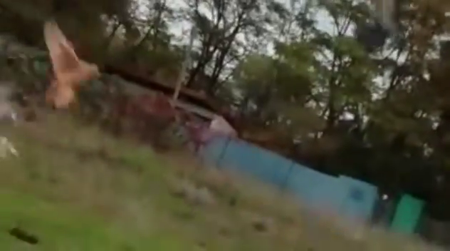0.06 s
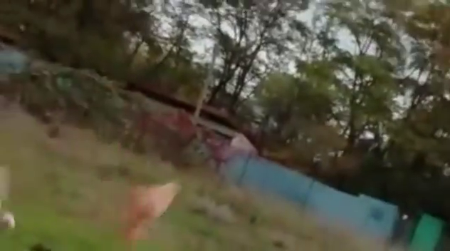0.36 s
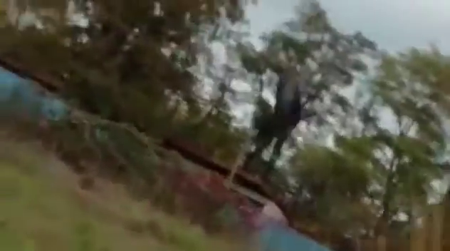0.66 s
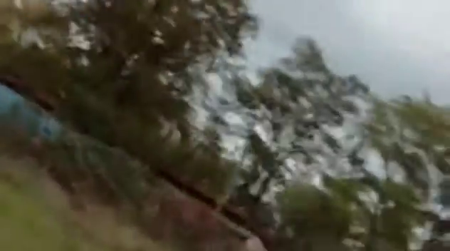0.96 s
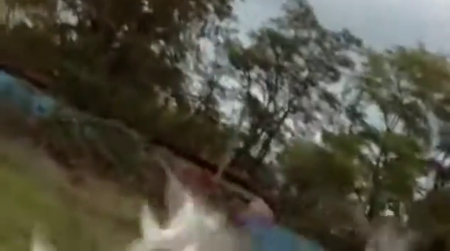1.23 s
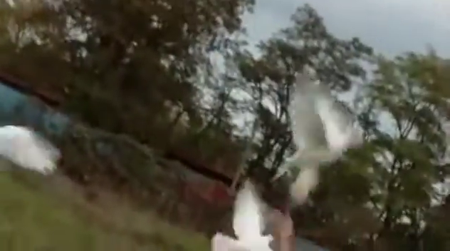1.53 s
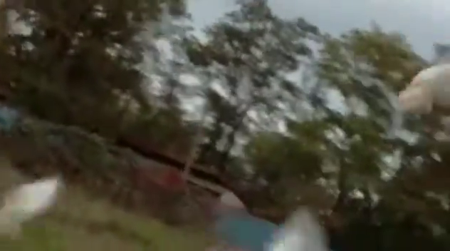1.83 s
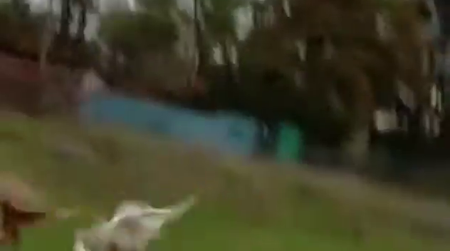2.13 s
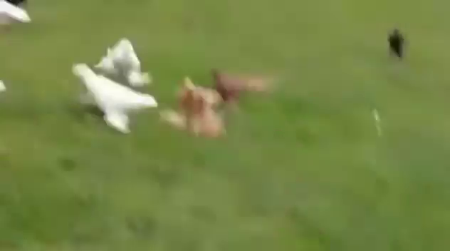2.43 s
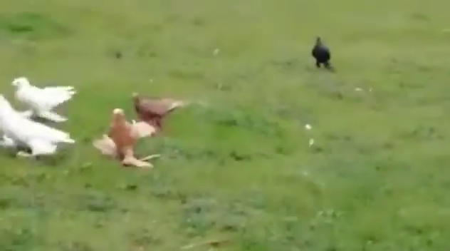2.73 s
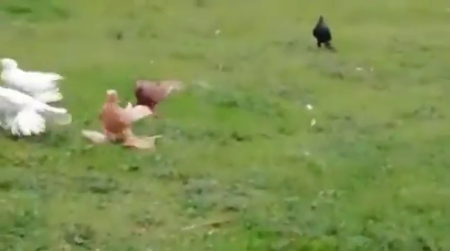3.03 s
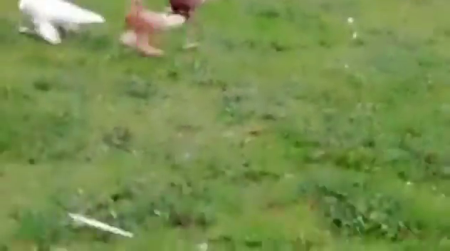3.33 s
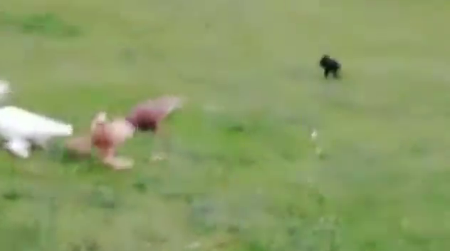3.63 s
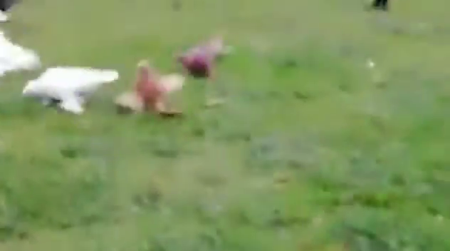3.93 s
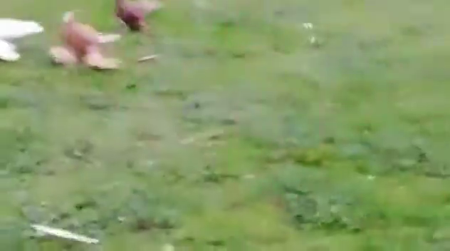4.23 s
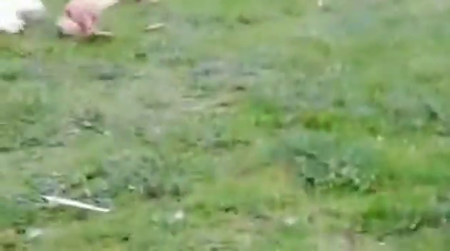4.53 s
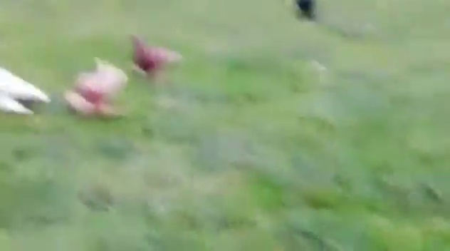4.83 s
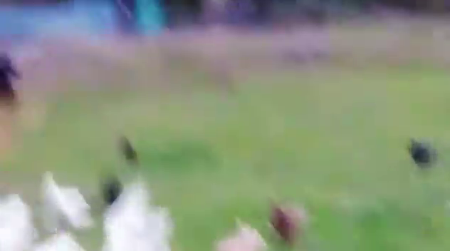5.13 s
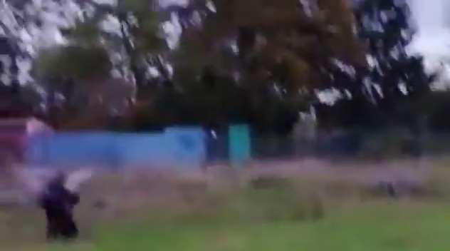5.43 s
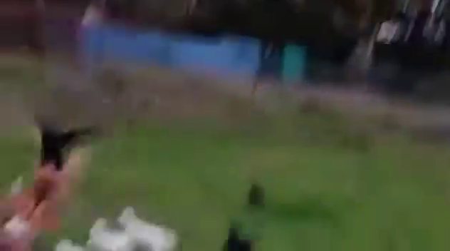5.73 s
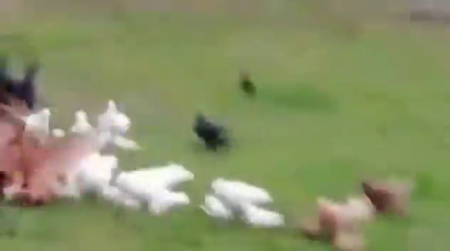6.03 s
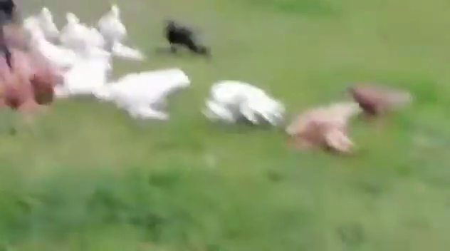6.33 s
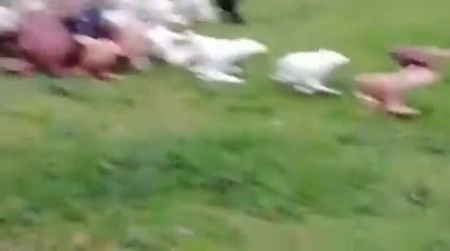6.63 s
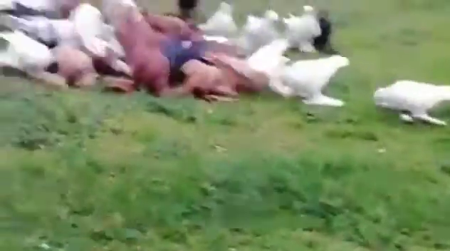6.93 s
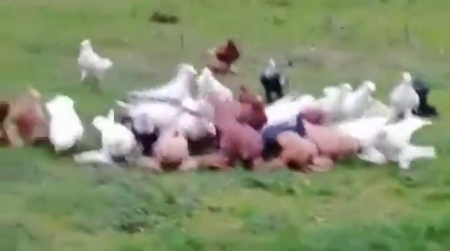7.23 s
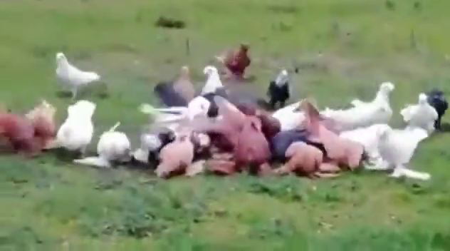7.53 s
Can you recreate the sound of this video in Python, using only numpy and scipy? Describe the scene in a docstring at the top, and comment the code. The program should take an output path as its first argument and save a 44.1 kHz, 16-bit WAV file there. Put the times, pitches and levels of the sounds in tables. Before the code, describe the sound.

Sharp wing claps and busy flapping open the scene as pigeons lift off from a yard. As they ease, something rustles nearby and flight feathers whistle faintly overhead. Light pecking follows, mixed with occasional flutters, tiny chirps and brief quiet coos, and then another burst of loud wing claps. The hand-held microphone catches soft wind puffs and a steady background hum, with one side sounding muffled.

```python
"""Pigeons take off from the grass of a yard: feathers flutter and flick, wings push air, and wing tips
clap, the fullest claps knocking on a trapped pocket of air. From about 2 s something rustles softly close
by and flight feathers whistle overhead. From about 3 s beaks peck at thrown feed; faint chirps and short
coos follow, and loud claps return at 7.5 s. Throughout, the yard hums and a breeze rumbles on a
hand-held recorder with one open port and one shadowed port."""
import sys
import numpy as np
from scipy import signal
from scipy.fft import rfft, irfft, next_fast_len
from scipy.io import wavfile
from scipy.ndimage import uniform_filter1d

SR = 44100
rng = np.random.default_rng(int(sys.argv[2]) if len(sys.argv) > 2 else 0)


def store_pcm(level_fs):
    """Save levels as 16-bit WAV."""
    pcm = np.round(np.clip(level_fs, -1, 1) * 32767).astype(np.int16)
    wavfile.write(sys.argv[1], SR, np.atleast_2d(pcm).T)


N = 342657
TIME = np.arange(N) / SR

# Spectra of the sources and of the echo. Each row: frequency in Hz, relative spectral density in dB.
RUMBLE_SPECTRUM = [(12, -5.5), (28, 1), (50, 0.5), (100, -4), (150, -15), (300, -41), (1000, -63)]
DRAUGHT_SPECTRUM = [(60, -4), (150, -2.5), (260, -3), (350, -9), (500, -28), (1500, -37.5)]
YARD_HUM_SPECTRUM = [(120, -28), (300, -4.5), (450, -0.5), (650, -2), (900, 1), (1300, -5.5), (2000, -13.5),
                     (3200, -20.5), (6000, -21), (14000, -14.5)]
FEATHER_RUSH_SPECTRUM = [(150, -19), (450, 3), (750, 2.5), (1300, 2.5), (2000, 1.5), (3200, -1.5),
                         (4200, -7), (5800, -2), (9000, -9), (15000, -25)]
FEATHER_EDGE_SPECTRUM = [(1500, -4), (4000, 7), (6000, 4.5), (10500, 7), (13500, 10), (16000, -26)]
CLAP_SPECTRUM = [(100, -51), (450, -32), (800, -5), (1150, 2), (1700, 5), (2800, 5.5), (4200, 0), (5800, 3),
                 (10000, 2), (13500, 3.5), (15500, -6)]
ECHO_SPECTRUM = [(200, 1.5), (700, 5.5), (2000, -9), (5000, -9), (14000, -52)]
CAPSULE_HISS_SPECTRUM = [(1500, -7.5), (3000, -9), (5000, -11.5), (12000, -18)]
# Breeze on the ports. Each row: time in seconds, relative level in dB.
BREEZE_LEVELS = [(0.0, -57), (0.5, -58.5), (1.25, -53), (3.01, -61), (5.6, -61), (5.89, -61), (6.79, -62.5),
                 (7.77, -62.5)]
# Puffs of wind on the ports. Each row: peak time in seconds, 1/e half length in seconds, level in dB.
WIND_PUFFS = [(2.437, 0.097, -53.5), (3.882, 0.087, -56.5), (4.194, 0.078, -50.5), (5.89, 0.077, -42.5),
              (6.388, 0.039, -42.5), (7.576, 0.032, -55)]
# Low draught of the wings. Each row: time in seconds, relative level in dB.
DRAUGHT_LEVELS = [(0.0, -66.5), (0.2, -58.5), (0.46, -58), (0.67, -64), (0.8, -58), (0.92, -46),
                  (0.99, -49), (1.11, -48), (1.2, -58), (1.31, -50.5), (1.4, -54.5), (1.53, -52.5),
                  (1.66, -60), (1.95, -63), (2.81, -67), (4.8, -70), (5.39, -61.5), (5.63, -69.5),
                  (6.04, -61.5), (6.43, -71), (7.36, -73.5), (7.77, -61)]
# Flutter of the flock. Each row: time in seconds, relative levels of rush and of edge hiss in dB.
FLOCK_LEVELS = [(0.0, -54, -57), (0.48, -54.5, -62), (0.69, -56.5, -56), (0.89, -49.5, -54),
                (0.97, -43, -50), (1.03, -42.5, -42.5), (1.13, -50.5, -54), (1.22, -47.5, -52.5),
                (1.43, -53, -51.5), (1.48, -53.5, -61), (1.56, -48, -55), (2.08, -55.5, -62),
                (2.53, -55.5, -56), (2.73, -59, -64), (3.24, -60.5, -67), (3.51, -65.5, -69),
                (4.05, -65, -72.5), (4.67, -69, -70.5), (5.19, -61.5, -62), (5.52, -64, -73.5),
                (6.04, -63, -67.5), (6.47, -71.5, -70), (7.2, -73.5, -89), (7.55, -63.5, -69),
                (7.77, -61.5, -69)]
# Near birds beating their wings. Each row: first stroke, last stroke and beat period in seconds,
# swish in dB relative to the flock.
WINGBEAT_RUNS = [(0.063, 0.595, 0.13, -2.5), (0.742, 1.1, 0.17, -5.5), (0.885, 2.15, 0.12, -28),
                 (1.32, 1.47, 0.1, -4), (1.555, 2.06, 0.11, -6.5), (2.922, 3.31, 0.13, -1.5),
                 (5.19, 5.45, 0.121, -12), (5.225, 5.77, 0.061, -24), (7.515, 7.77, 0.13, 3.5)]
# Light ticks: wing flicks in flight, later (about 3 to 7 s) beaks pecking at feed.
# Each row: time in seconds, level in dB, treble tilt in dB.
FLICKS_AND_PECKS = [(0.034, -48, 8), (0.044, -37, 0), (0.058, -38.5, -1), (0.065, -38, -5), (0.169, -40, 9),
                    (0.225, -42, 14), (0.305, -45, 13), (0.325, -40, 6), (0.406, -39.5, 21),
                    (0.456, -42, -4), (0.469, -31, 13), (0.5445, -52, 10), (0.588, -40.5, 6),
                    (0.613, -46, -10), (0.718, -41, 3), (0.7416, -46, -9), (0.77, -42.5, -22),
                    (0.825, -35, 3), (0.8998, -37, 8), (0.9575, -41, -2), (1.007, -32, 7), (1.082, -41, 7),
                    (1.1175, -30, -14), (1.190, -36, 6), (1.2344, -44, 5), (1.271, -30, 5),
                    (1.3917, -37, -3), (1.433, -36, -1), (1.4495, -39, -3), (1.503, -33, 6),
                    (1.5552, -34, 1), (1.633, -37.5, 7), (1.7091, -40, 14), (1.745, -34.5, 9),
                    (1.814, -38, -14), (1.870, -37.5, 6), (1.8875, -40, 7), (1.923, -33.5, 4),
                    (2.047, -39, 12), (2.063, -37, -4), (2.136, -53, -3), (2.291, -41, 13),
                    (2.548, -42.5, -1), (2.677, -41.5, 2), (2.7337, -47, 8), (2.893, -45.5, 8),
                    (2.951, -43.5, 12), (3.132, -49, 17), (3.18, -42, 2), (3.263, -47, 14),
                    (3.3157, -43, 5), (3.407, -52, -18), (3.441, -50, -13), (3.6367, -56, 10),
                    (3.7112, -53, 13), (3.744, -48.5, 2), (3.78, -49, -16), (4.0402, -57, -24),
                    (4.342, -49.5, 4), (4.397, -59, -2), (4.706, -53, 4), (4.766, -48.5, -1),
                    (5.1001, -49, 3), (5.15, -56, 5), (5.202, -46, -7), (5.328, -47, -10),
                    (5.436, -46.5, -2), (5.496, -46, 1), (5.631, -42.5, -3), (5.646, -49, -5),
                    (5.6951, -63, -15), (5.8575, -54, 0), (5.919, -52.5, -6), (6.127, -48, -6),
                    (6.19, -53.5, -2), (6.3983, -52.5, -4), (6.465, -52, -3), (6.519, -52.5, 8),
                    (6.717, -50, 11), (6.81, -52.5, 0), (7.237, -52, 11), (7.425, -47, 21),
                    (7.5054, -28.5, 8), (7.759, -43, 9)]
# Wing tips meeting, and between about 3 and 7 s isolated ticks of beaks pecking. Each row: time in seconds, #
# level in dB, treble tilt in dB, decay time in ms, resonance in Hz.
CLAPS_AND_TICKS = [(0.2013, -36, 2, 2.7, 3900), (0.4622, -34, 5, 2.1, 6200), (0.4882, -37, 8, 2.0, 5800),
                   (0.7107, -25.5, -2, 2.4, 5200), (0.8879, -32, -1, 1.3, 2600), (0.9288, -26.5, -2, 1.3, 2900),
                   (0.9364, -32, 5, 2.0, 5900), (0.9465, -22.5, 1, 1.4, 2400), (1.0124, -29, 10, 1.4, 6200),
                   (1.0492, -21.3, 3, 1.5, 4700), (1.0609, -30, -1, 2.8, 4400), (1.112, -27, -1, 3.0, 4300),
                   (1.1375, -34, -3, 1.7, 1700), (1.1698, -34, 3, 1.8, 3400), (1.2514, -32, 4, 1.9, 6200),
                   (1.2915, -29, 7, 1.6, 6200), (1.3782, -37, 3, 1.4, 6200), (1.4015, -32, 5, 1.7, 6000),
                   (1.4233, -31, 0, 2.8, 2800), (1.4532, -17.3, -5, 1.0, 3200), (1.4992, -35.5, -2, 1.8, 6100),
                   (1.5116, -33, 8, 1.7, 5500), (1.5424, -32.5, -4, 1.2, 3300), (1.5633, -34, -3, 3.3, 2700),
                   (1.6221, -35, 5, 2.2, 5200), (1.6796, -24.8, 0, 1.6, 2800), (1.7651, -32, -1, 2.6, 2800),
                   (1.8015, -28.5, -4, 1.7, 3000), (1.929, -36, 0, 1.9, 5800), (1.9972, -36, 0, 2.5, 3300),
                   (2.0194, -36, -7, 1.3, 2000), (2.1575, -35, 5, 1.3, 5600), (2.5181, -39, -5, 1.3, 3200),
                   (3.0519, -38, 2, 2.2, 5100), (3.3637, -41, 2, 1.6, 2300), (3.5869, -43, 8, 1.2, 6200),
                   (3.8545, -35, 9, 1.3, 11000), (4.2054, -42, 9, 1.1, 6000), (4.2579, -47, 4, 2.1, 6200),
                   (4.5628, -47, 5, 1.3, 5100), (4.9261, -48, 0, 1.9, 4900), (4.973, -43, 8, 1.3, 6200),
                   (5.1535, -37.5, -5, 1.1, 3600), (5.2295, -39, 4, 2.6, 5900), (5.3018, -34.5, 0, 2.6, 4700),
                   (5.3535, -41, 6, 1.6, 1600), (5.784, -42, -3, 2.4, 3400), (5.7933, -38, 6, 1.4, 4400),
                   (6.4406, -36, 2, 1.5, 3200), (6.8334, -43, -2, 1.8, 2000), (6.9476, -35, 8, 1.4, 12000),
                   (7.5086, -27, 1, 3.2, 5900), (7.635, -21, 2, 3.4, 4700), (7.7625, -40, -1, 2.3, 5500)]
# Air pockets trapped by claps. Each row: start in seconds, pitch in Hz, fundamental's peak in dB.
AIR_KNOCKS = [(0.7105, 2180, -25.5), (1.0495, 1110, -39), (1.453, 810, -30), (1.68, 965, -37),
              (6.9465, 325, -40.5), (7.507, 660, -27), (7.636, 1290, -30), (7.757, 1530, -37)]
# Short bands of noise: soft rustles and, in the last two rows, the ring and tail of the last claps.
# Each row: peak time, rise and fall in seconds, level in dB, centre in Hz, width in octaves.
RUSTLES_AND_CLAP_TAILS = [(2.2, 0.029, 0.02, -39, 1550, 0.16), (2.205, 0.038, 0.012, -38.5, 2860, 0.46),
                          (2.3, 0.02, 0.045, -45, 1660, 0.35), (2.41, 0.11, 0.032, -47, 3100, 0.34),
                          (2.429, 0.076, 0.042, -46, 5400, 0.13), (2.552, 0.023, 0.026, -40, 5340, 0.1),
                          (2.61, 0.039, 0.041, -40.5, 5650, 0.3), (2.672, 0.024, 0.034, -43, 5900, 0.36),
                          (2.6, 0.067, 0.064, -48, 2830, 0.16), (2.699, .004, .012, -54, 3200, .1),
                          (2.902, .008, .004, -43, 6000, 0.21), (2.927, 0.0063, 0.011, -41, 5800, 0.21),
                          (2.953, 0.007, 0.011, -36.5, 6100, 0.23), (2.979, .004, .014, -41.5, 6240, 0.23),
                          (3.845, 0.041, 0.024, -39.5, 10700, 0.38),
                          (3.845, 0.029, 0.028, -44.5, 13300, 0.22),
                          (3.856, 0.012, 0.0084, -36.5, 1780, 5.1), (4.06, 0.023, 0.027, -62, 1380, 0.21),
                          (5.19, 0.05, 0.046, -55, 4800, 0.65), (6.452, 0.0092, 0.0079, -45, 10000, 1.6),
                          (6.888, 0.038, 0.012, -52, 1660, 0.8), (7.42, 0.019, 0.023, -53.5, 1500, 1.6),
                          (7.524, 0.0063, 0.017, -45.5, 655, 0.17), (7.658, .008, 0.024, -48, 3600, 1.3)]
# Whistling wing strokes. Each row: first stroke, last stroke and beat period in seconds,
# typical start pitch in Hz, typical level in dB.
WHISTLE_RUNS = [(2.35, 3.4, 0.131, 670, -55), (7.11, 7.26, 0.15, 600, -61)]
# Chirps and coos. Each row: start and length in seconds, start and end pitch in Hz, level in dB.
CHIRP_NOTES = [(3.908, 0.052, 2420, 2290, -55.5), (3.91, .04, 1590, 1620, -58),
               (3.922, .04, 1090, 1150, -57), (3.92, .04, 770, 790, -59), (4.055, 0.034, 2360, 2340, -55),
               (7.275, 0.036, 1980, 2050, -60)]
COO_NOTES = [(4.082, 0.052, 276, 265, -42), (4.155, 0.072, 156, 157, -52.5), (4.16, 0.065, 319, 296, -50.5),
             (5.895, 0.035, 445, 475, -54), (5.95, 0.04, 414, 390, -52), (5.998, 0.036, 364, 318, -51.5),
             (6.052, 0.05, 214, 206, -49.5), (6.215, 0.04, 249, 240, -61), (6.849, 0.18, 333, 276, -66)]


def from_db(db):
    """Amplitude grows tenfold for every 20 dB."""
    return 10 ** (np.asarray(db) / 20)


def rms_one(x):
    """Normalisation brings a signal to unit mean power."""
    return x / np.sqrt(np.mean(x ** 2) + 1e-20)


def in_time(rows):
    """Linear interpolation gives each column of a level table at every sample."""
    times, *columns = np.transpose(rows)
    return [np.interp(TIME, times, column) for column in columns]


def coloured(x, spectrum, bright_db=0):
    """Spectral shaping weights each frequency, with a tilt of bright_db from 2 to 10 kHz; rms 1."""
    size = next_fast_len(len(x))
    log_hz = np.log(np.fft.rfftfreq(size, 1 / SR) + 1)
    hz, db = np.transpose(spectrum)
    tilt = np.clip((log_hz - np.log(2000)) / np.log(5), -.5, 1)
    gain = from_db(np.interp(log_hz, np.log(hz), db) + bright_db * tilt)
    return rms_one(irfft(rfft(x, size) * gain, size)[:len(x)])


def noise(spectrum):
    """Filtered white noise takes on the spectrum of its filter; rms 1."""
    return coloured(rng.standard_normal(N), spectrum)


def drift(rate_hz):
    """Low-passed noise wanders at random, mostly slower than rate_hz; rms 1."""
    pole = np.exp(-2 * np.pi * rate_hz / SR)
    return rms_one(signal.lfilter([1], [1, -2 * pole, pole * pole], rng.standard_normal(N + SR))[SR:])


def impulses(per_s):
    """Independent random events form a Poisson train of impulses; rms 1."""
    return rms_one((rng.random(N) < per_s / SR) * rng.standard_normal(N))


def hump(t, rise, fall):
    """A two-sided Gaussian envelope swells to 1 at t = 0 and fades."""
    return np.exp(-(t / np.where(t < 0, rise, fall)) ** 2)


def delayed(x, seconds):
    """A longer path delays the arrival of a wave."""
    return np.interp(TIME - seconds, TIME, x, left=0)


def strokes(runs):
    """Wingbeats are periodic: each stroke gets a row with its time and its run's remaining columns."""
    return np.array([(s, *rest) for first, last, period, *rest in runs
                     for s in np.arange(first, last + period / 2, period)])


def moving_air(breeze_gain_db=3, draught_gain_db=4):
    """Unsteady flow presses on the ports: breeze and puffs rumble, and wings push a low draught."""
    (breeze_db,), (draught_db,) = in_time(BREEZE_LEVELS), in_time(DRAUGHT_LEVELS)
    rumble, puffs = noise(RUMBLE_SPECTRUM), 0
    for s, half_s, db in WIND_PUFFS:
        swell = hump(TIME - s, half_s, half_s)
        puffs += from_db(db) * swell * np.linalg.norm(swell) / np.linalg.norm(swell * rumble)
    draught = from_db(draught_db + draught_gain_db) * noise(DRAUGHT_SPECTRUM)
    return (from_db(breeze_db + breeze_gain_db) + puffs) * rumble + draught


def scuff_envelope(per_s=70, decay_s=.0045, share=.56):
    """Incoherent sources add in power: each touch of two feathers lifts the rush and dies away."""
    touches = (rng.random(N) < per_s / SR) * rng.uniform(.3, 1, N)
    power = signal.lfilter([1], [1, -np.exp(-1 / (decay_s * SR))], touches + 1e-18)
    return np.sqrt(1 - share + share * power / power.mean())


def flutter(throb_hz=20, throb_db=2.5, lull_s=.0028, lull_db=8, rush_gain_db=6.5, hiss_gain_db=8):
    """Overlapping wing strokes modulate broadband noise, with fine ticks of feather on feather."""
    rush_db, hiss_db = in_time(FLOCK_LEVELS)
    # every downstroke of a near bird swishes above the flock
    coarse = TIME[::20]
    swish = 1 + sum(from_db(db) * hump(coarse - s, .007, .024) for s, db in strokes(WINGBEAT_RUNS))
    # a wing slows at the top of its stroke, so the rush sinks just before each clap
    tops = np.array(CLAPS_AND_TICKS)[:, 0] - 5.5 * lull_s
    nearest = np.rint(np.interp(TIME, tops, np.arange(len(tops)))).astype(int)
    lull = np.exp(-((TIME - tops[nearest]) / lull_s) ** 2)
    envelope = np.interp(TIME, coarse, swish) * scuff_envelope()
    envelope *= from_db(throb_db * drift(throb_hz) - lull_db * lull)
    ticks = .17 * impulses(per_s=150)
    rush = coloured(rng.standard_normal(N) + ticks, FEATHER_RUSH_SPECTRUM)
    hiss = coloured(rng.standard_normal(N) + ticks, FEATHER_EDGE_SPECTRUM)
    return envelope * (from_db(rush_db + rush_gain_db) * rush + from_db(hiss_db + hiss_gain_db) * hiss)


def flicks_and_pecks(strays_per_s=3, decay_ms=3, ring_hz=3860, spread_octaves=.52):
    """Light impacts tick like small claps: wings flick, later beaks peck; other birds add faint ones."""
    flock_s, flock_db, _ = np.transpose(FLOCK_LEVELS)
    times = TIME[(rng.random(N) < strays_per_s / SR) & (TIME > .02)]
    strays = [(s, np.interp(s, flock_s, flock_db) - 6 - 3.5 * soft, 7 + 3 * bright)
              for s, (soft, bright) in zip(times, rng.standard_normal((len(times), 2)))]
    rows = []
    for s, db, bright_db in FLICKS_AND_PECKS + strays:
        hz = ring_hz * 2 ** (spread_octaves * rng.standard_normal())
        rows.append((s, db, bright_db, decay_ms, min(hz, SR / 4)))
    return claps(rows)


def claps(rows, colour_db=1.5, ragged_db=5.5, brush_db=-24, brush_s=.016, ground_lag_s=.001193):
    """An impact radiates a broadband pulse: in a wing clap feathers touch, tips crack, vanes part."""
    out = np.zeros(N + SR)
    t = np.arange(-SR // 100, SR // 16) / SR
    after, before = np.maximum(t, 0), np.maximum(-t, 0)
    for s, db, bright_db, decay_ms, ring_hz in rows:
        decay_s = decay_ms / 1000
        spectrum = [(hz, gain + colour_db * rng.standard_normal()) for hz, gain in CLAP_SPECTRUM]
        rise = np.exp(-before / (.25 * decay_s))
        fall = np.exp(-after / decay_s) + from_db(brush_db) * np.exp(-after / brush_s)
        # the flight feathers land one after another
        ragged = from_db(ragged_db * np.interp(t, t[::20], rng.standard_normal(len(t[::20]))))
        contact = coloured(rng.standard_normal(len(t)), spectrum, bright_db)
        crack = coloured((t == 0).astype(float), spectrum, bright_db + 3)
        slap = rms_one(contact * rise * fall * ragged) + .85 * crack
        # every wing cups the air differently and resonates at a pitch of its own
        direct = slap + 1.1 * signal.lfilter(*signal.iirpeak(ring_hz, Q=4, fs=SR), slap)
        # a dull reflection off the turf interferes and makes the clap hollow
        lag = round(ground_lag_s * np.exp(.13 * rng.standard_normal()) * SR)
        bounce = np.roll(uniform_filter1d(direct, size=5), lag)
        # the burst carries the energy of 8 ms at its stated level
        burst = rms_one(direct + .8 * bounce) * np.sqrt(.008 * SR / len(t))
        start = round((s + t[0]) * SR)
        out[start:start + len(t)] += from_db(db) * burst
    return out[:N]


def knocks(decay_s=.003, overtone_ratio=2.2, overtone_db=-1):
    """Air trapped by the fullest claps is a damped resonator, ringing briefly with one overtone."""
    out = np.zeros(N)
    for s, hz, db in AIR_KNOCKS:
        on = (TIME > s) & (TIME < s + 10 * decay_s)
        t = TIME[on] - s
        phase = 2 * np.pi * hz * t
        ring = np.sin(phase) + from_db(overtone_db) * np.sin(overtone_ratio * phase)
        out[on] += from_db(db) * np.exp(-t / decay_s) * ring
    return out


def rustles_and_clap_tails(grain_db=2, skirt_db=10):
    """Band-limited noise swells and fades: soft rustles, then the ring and tail of the last claps."""
    out = np.zeros(N)
    crackle = .65 * impulses(per_s=600)
    grainy_hiss = rng.standard_normal(N) + crackle
    for s, rise, fall, db, hz, octaves in RUSTLES_AND_CLAP_TAILS:
        on = (TIME > s - 3 * rise) & (TIME < s + 3 * fall)
        band = [(hz * 2 ** (k * octaves), -skirt_db * np.log1p(k * k / 2)) for k in range(-8, 9)]
        out[on] += from_db(db) * hump(TIME[on] - s, rise, fall) * coloured(grainy_hiss[on], band)
    return out * from_db(grain_db * drift(120))


def gliding_tones(rows, waver, rasp_db, partials_db):
    """Random modulation of frequency (waver) and amplitude (rasp) roughens short harmonic glides."""
    out = np.zeros(N)
    unsteady = 1 + waver * drift(69)
    for s, length, start_hz, end_hz, db in rows:
        on = (TIME > s) & (TIME < s + length)
        progress = (TIME[on] - s) / length
        hz = (start_hz + (end_hz - start_hz) * progress) * unsteady[on]
        phase = 2 * np.pi * np.cumsum(hz) / SR
        tone = sum(from_db(gain) * np.sin(k * phase) for k, gain in enumerate(partials_db, 1))
        out[on] += from_db(db) * np.sqrt(2) * np.sin(np.pi * progress) * tone
    return out * from_db(rasp_db * drift(125))


def feather_whistles(length_s=.065, glide=1.08, scatter_s=.015, scatter_octaves=.16, scatter_db=1.5):
    """Airflow through the flight feathers excites a rising, raspy tone, different on each stroke."""
    s, hz, db = strokes(WHISTLE_RUNS).T
    late, sharp, loud = rng.standard_normal((len(s), 3)).T
    hz = hz * 2 ** (scatter_octaves * sharp)
    rows = zip(s + scatter_s * late, np.full(len(s), length_s), hz, hz * glide, db + scatter_db * loud)
    return gliding_tones(rows, waver=.07, rasp_db=3.5, partials_db=[0, -7, -7])


def chirps():
    """Brief high tones with a rapidly fluctuating amplitude are heard as faint squeaks."""
    return gliding_tones(CHIRP_NOTES, waver=.015, rasp_db=3, partials_db=[0, -18])


def coos():
    """A pigeon's voice is a nearly pure tone: a low fundamental with a weak second harmonic."""
    return gliding_tones(COO_NOTES, waver=.015, rasp_db=1.5, partials_db=[0, -22])


def yard_echo(x, t60_s=.98, onset_s=.00095, wet_db=-22):
    """Scattering from fences and trees leaves a thin, dull tail that decays exponentially."""
    t = TIME[:SR // 2]
    envelope = from_db(-60 * t / t60_s) * (1 - np.exp(-t / onset_s))
    tail = coloured(rng.standard_normal(len(t)), ECHO_SPECTRUM) * envelope
    return from_db(wet_db) * signal.fftconvolve(x, tail / np.linalg.norm(tail))[:N]


def shadowed(x, corner_hz=270, lag_s=.00054, gain_db=.5, scatter_db=-23, scatter_hz=5000):
    """Low frequencies diffract into the acoustic shadow, so the far port hears late, muffled sound."""
    muffled = signal.sosfilt(signal.butter(1, corner_hz, fs=SR, output="sos"), delayed(x, lag_s))
    # treble arrives by three scattered paths whose strengths shift as the birds move
    paths = rng.standard_normal((3, SR // 200)) * np.exp(-np.linspace(0, 4, SR // 200))
    paths /= np.linalg.norm(paths)
    scattered = sum(drift(46) * signal.oaconvolve(x, path)[:N] for path in paths)
    dulled = signal.sosfilt(signal.butter(2, scatter_hz, fs=SR, output="sos"), scattered)
    return from_db(gain_db) * muffled + from_db(scatter_db) * dulled


def scene(hum_db=-57.5, capsule_hiss_db=-69.5):
    """Pressures superpose at two ports: sound is shadowed at the far one, while wind presses on both."""
    birds = claps(CLAPS_AND_TICKS) + flutter() + feather_whistles() + flicks_and_pecks() + knocks()
    calls = coos() + chirps()
    sound = birds + yard_echo(birds) + rustles_and_clap_tails() + calls
    sound += from_db(hum_db) * noise(YARD_HUM_SPECTRUM)
    wind = moving_air()
    far_wind = from_db(1.46) * delayed(wind, seconds=.0008)
    capsule_hiss = from_db(capsule_hiss_db) * noise(CAPSULE_HISS_SPECTRUM)
    return np.array([sound + wind, shadowed(sound) + capsule_hiss + far_wind])


def record(dry, notch_hz=7900, notch_q=2.34, notch_depth=.62, cutoff_hz=14400):
    """Each port's duct is an acoustic filter that hollows the treble; a steep low-pass cuts the top."""
    notched = signal.lfilter(*signal.iirnotch(notch_hz, notch_q, fs=SR), dry)
    hollowed = dry + notch_depth * (notched - dry)
    return signal.sosfilt(signal.ellip(10, .3, 80, cutoff_hz, fs=SR, output="sos"), hollowed)


dry = scene()
out = record(dry)
store_pcm(out)
```